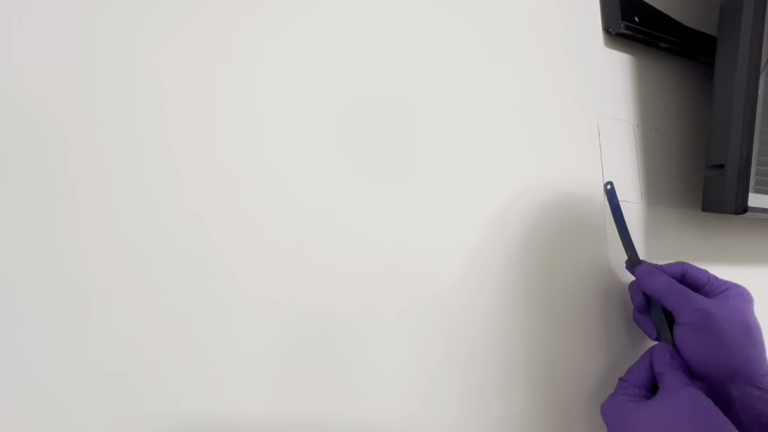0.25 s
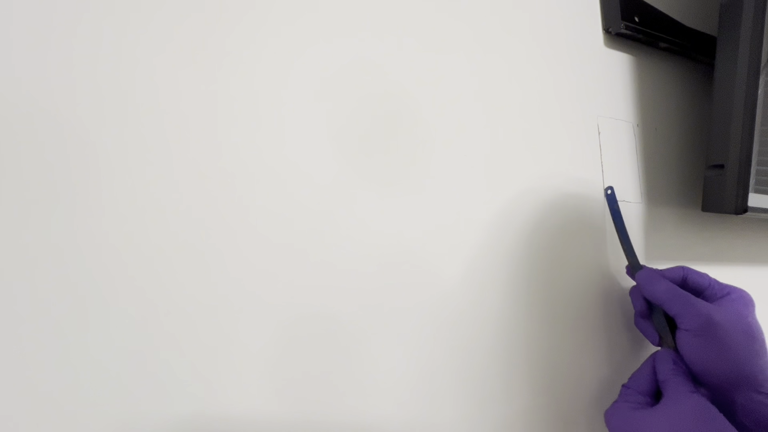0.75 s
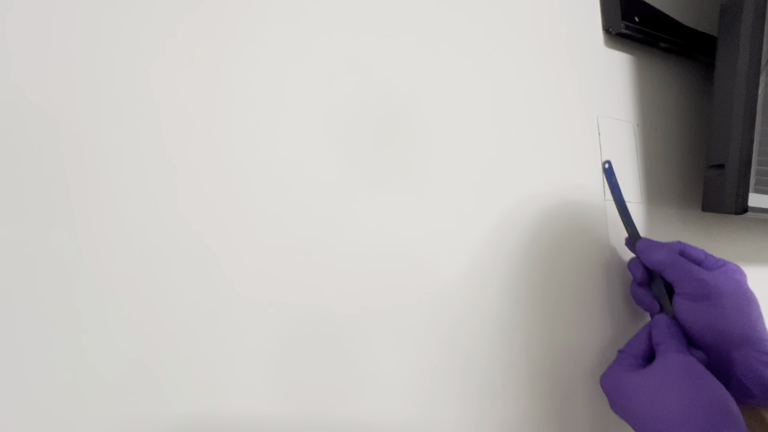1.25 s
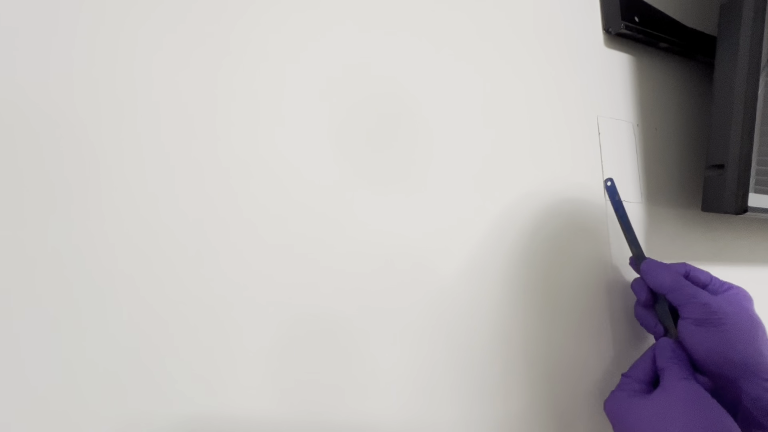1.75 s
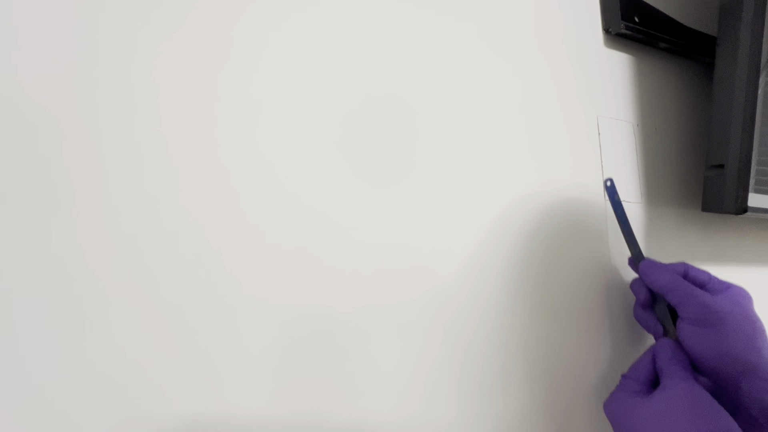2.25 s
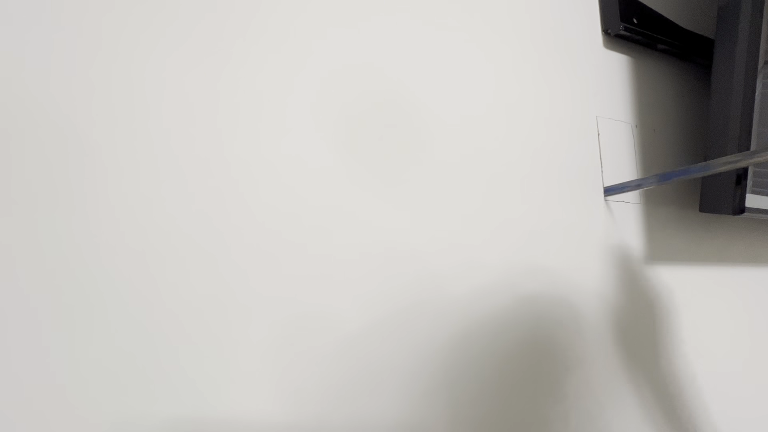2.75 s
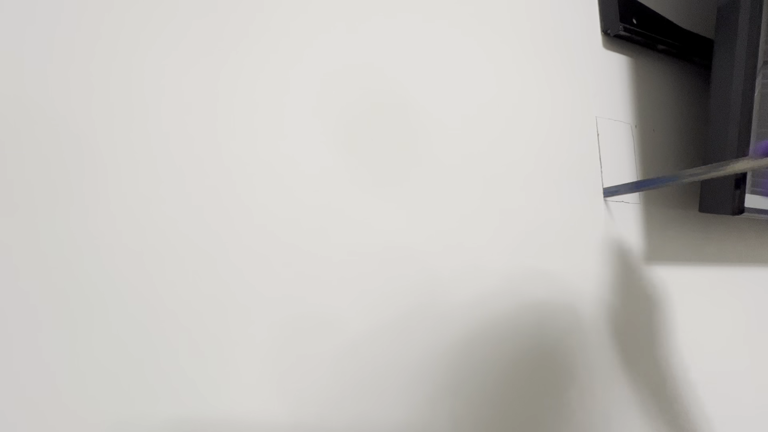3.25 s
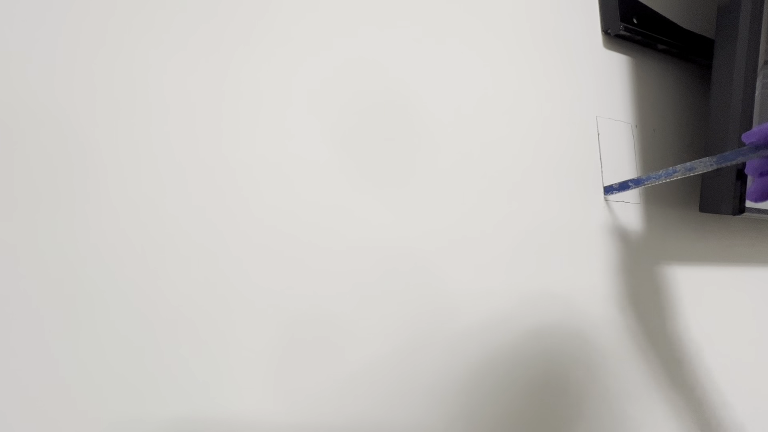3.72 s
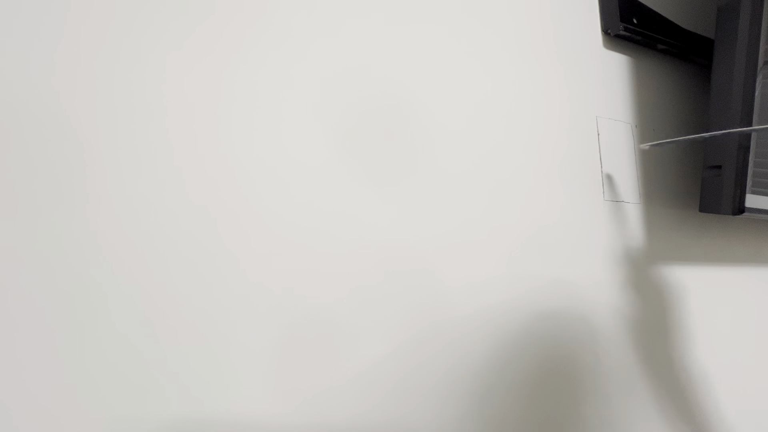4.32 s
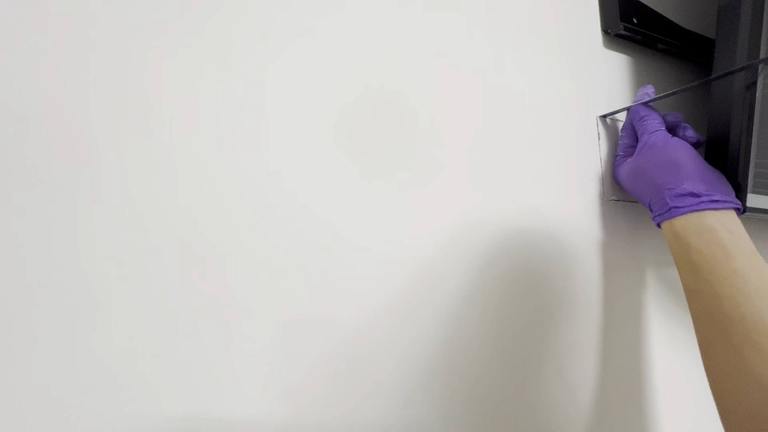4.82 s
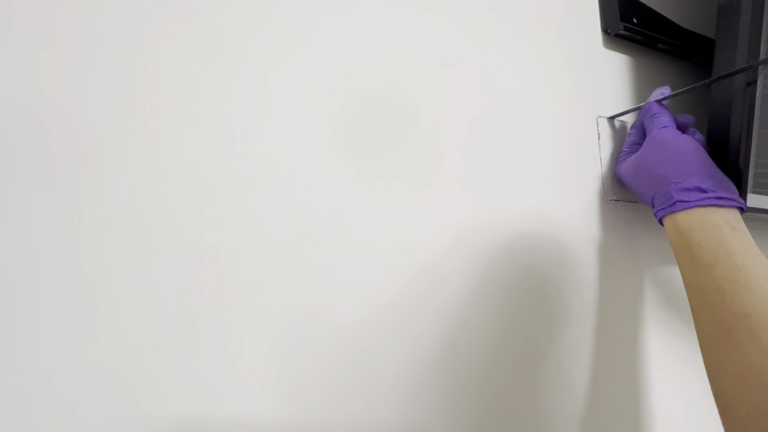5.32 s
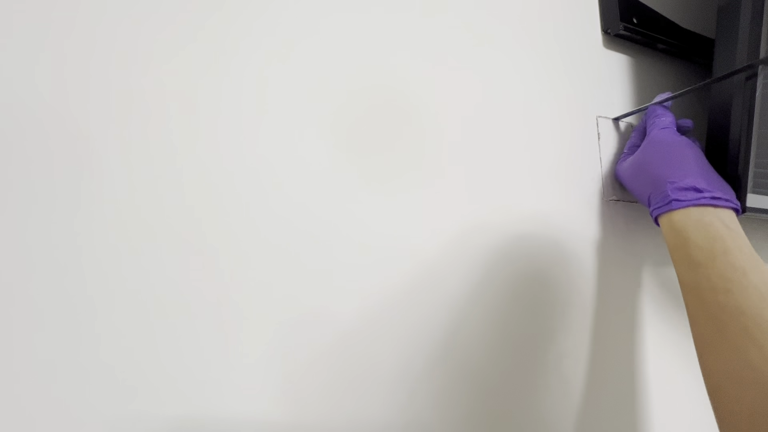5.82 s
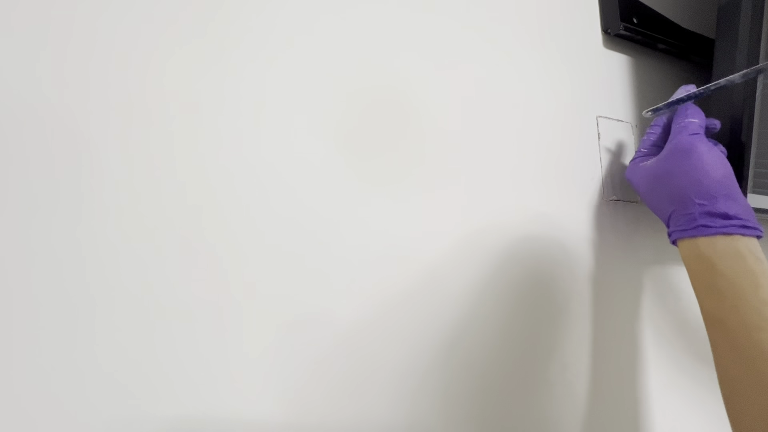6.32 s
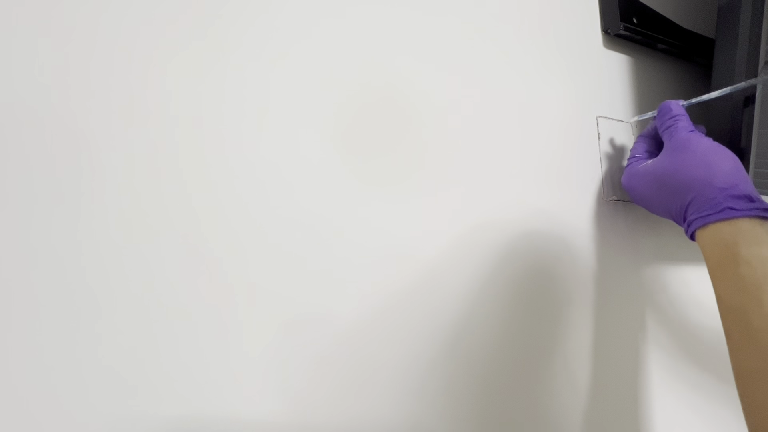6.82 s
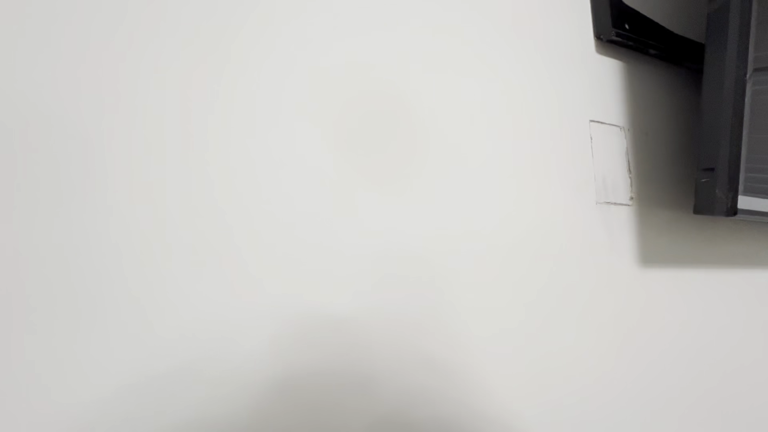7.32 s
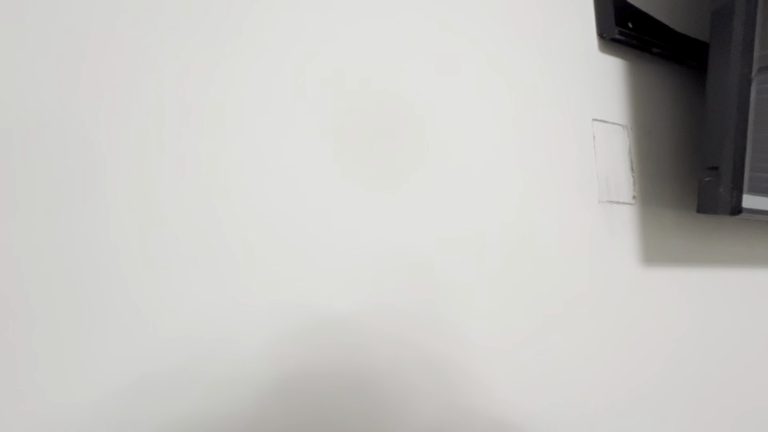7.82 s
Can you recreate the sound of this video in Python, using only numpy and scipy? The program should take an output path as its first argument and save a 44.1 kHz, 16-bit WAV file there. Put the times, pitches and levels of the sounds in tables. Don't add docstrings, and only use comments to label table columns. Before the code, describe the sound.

Close indoor drywall cutting: faint rhythmic scoring, a burst of rough hollow sawing, gentle scraping, near quiet, then one hard cracking blow and bumps.

```python
import sys
import numpy as np
from scipy import signal
from scipy.fft import rfft, irfft, next_fast_len
from scipy.io import wavfile
from scipy.ndimage import map_coordinates

SR = 44100
rng = np.random.default_rng(int(sys.argv[2]) if len(sys.argv) > 2 else 0)


def bounce(signal):
    frames = np.transpose(np.atleast_2d(signal))
    limited = np.clip(frames, -1, 1)
    pcm = np.round(limited * 32767).astype(np.int16)
    wavfile.write(sys.argv[1], SR, pcm)


def voltage_ratio(decibels):
    exponent = np.asarray(decibels, float) / 20
    return 10 ** exponent


N = 355887

# pitch in Hz, width in Hz, level in dB.
BOARD_MODES = [(349, 30, -2.5), (413, 21.3, 1), (458.4, 16, -0.5), (563.7, 11, 5), (625.4, 14, 4.5),
               (687, 11, 6), (756.8, 16, 2.5), (880, 10, 2.5), (905.4, 22, 0.5), (1092, 10, 7.5),
               (1169, 9.9, 0), (1445, 25, 4.5), (1484, 16, 2.5), (1752, 20, 11)]
SCENE_CHANGES = [2.452, 3.458, 4.46, 7.213]
DEEP_BITE = .52


def unit(x):
    return x / np.sqrt(np.mean(x ** 2) + 1e-20)


def along(points, hz):
    f, v = np.transpose(points)
    return np.interp(np.log(hz + 1), np.log(f + 1), v)


def filtered(x, response):
    m = next_fast_len(N + SR // 2)
    return irfft(rfft(x, m) * response(np.fft.rfftfreq(m, 1 / SR)), m)[..., :N]


def modes(table, f):
    total = 0
    for k, (centre, width, db) in enumerate(table):
        ring = 1j * f * width / (centre * centre - f * f + 1j * f * width)
        total = total + (-1) ** k * voltage_ratio(db) * ring
    return total


def wobble(rate):
    knots = rng.standard_normal(int(N * rate / SR) + 4)
    return map_coordinates(knots, [np.arange(N) * rate / SR])


def curves(table):
    s, *cols = np.transpose(table)
    return [np.interp(np.arange(N) / SR, s, c) for c in cols]


def crumbs(spiky_db, rate):
    return unit(rng.standard_normal(N) * voltage_ratio(spiky_db * wobble(rate)))


def ports(near, far, side, alike):
    # pitch in Hz, further lag of the left port in radians.
    twist = [(60, -0.094), (330, -0.71), (480, 1), (680, 1), (950, 0.28), (2000, -0.27), (2800, -1.44),
             (4000, 0.39), (6000, 0.47), (8700, -2)]
    lag_s = 12 / SR
    turn = lambda hz: np.arccos(np.clip(along(alike, hz), -1, 1)) / 2
    mid, rest = filtered(np.array([near, far]), lambda hz: np.array([np.cos(turn(hz)), np.sin(turn(hz))]))
    half = np.array([[.5], [-.5]])

    def response(hz):
        delay = np.exp(-2j * np.pi * hz * lag_s * (half + .5) - 1j * half * along(twist, hz))
        return voltage_ratio(half * along(side, hz)) * delay

    return filtered(np.array([mid + rest, mid - rest]), response)


def layer(source, response, level_db):
    # pitch in Hz, left minus right in dB.
    side = [(60, 4.5), (150, 5.5), (380, 0), (800, 2.5), (2000, 4), (3000, 0.5), (4500, -4.5), (6400, 2.5),
            (7500, -1), (8700, -8.5), (12000, 0.5)]
    # pitch in Hz, likeness of the two ports from 0 to 1.
    alike = [(60, 0.78), (130, 0.7), (300, 0.44), (480, 0.27), (700, 0.65), (1500, 0.56), (3000, 0.12),
             (8000, 0.37)]
    near, far = (unit(filtered(x, response)) for x in source)
    return voltage_ratio(level_db) * ports(near, far, side, alike)


def place_index():
    starts = [0, 2.452, 3.458, 3.97, 4.46, 7.213, 7.425]
    return np.searchsorted(starts, np.arange(N) / SR, "right") - 1


def weight():
    # time in seconds, level in dB.
    resting = [(0, -54.5), (2.44, -58.5), (2.46, -46.5), (3.45, -43), (3.465, -63), (4.44, -62.5),
               (4.47, -50.5), (5.2, -57.5), (5.98, -42), (6.2, -57.5), (6.5, -67.5), (6.83, -67),
               (7.2, -83), (7.24, -38.5), (7.65, -49), (8.07, -68.5)]
    return curves(resting)[0]


def swells(rows, rest_db, sharp):
    rise_full, fall_full = 1.31, 0.95
    sharpness = np.array([[1], [sharp]])
    t, power = np.arange(N) / SR, voltage_ratio(2 * np.array(rest_db))
    for s, first_db, second_db, rise, fall in rows:
        near = slice(max(int((s - rise) * SR), 0), int((s + fall) * SR))
        u = t[near] - s
        rising = 1 - np.abs(u / rise) ** rise_full
        falling = 1 - np.abs(u / fall) ** fall_full
        same_scene = np.searchsorted(SCENE_CHANGES, t[near]) == np.searchsorted(SCENE_CHANGES, s)
        root = np.clip(np.where(u < 0, rising, falling), 0, 1) * same_scene
        power[:, near] += voltage_ratio(2 * np.array([[first_db], [second_db]])) * root ** (4 * sharpness)
    return 10 * np.log10(power)


def strokes():
    # fastest moment in seconds, teeth in dB, grit in dB, rise and fall in seconds.
    light = [(.034, -51.5, -57.5, 0.063, 0.11), (.176, -49, -61, 0.12, 0.14), (.296, -53.5, -60, 0.1, 0.15),
             (.418, -48, -59.5, 0.047, .11), (.55, -54.5, -61.5, 0.093, 0.12),
             (.695, -52, -63, 0.082, 0.12), (.829, -60.5, -73, .07, 0.16), (.957, -47.5, -60, 0.05, 0.17),
             (1.097, -54.5, -63, 0.091, 0.16), (1.24, -47, -53, 0.066, 0.15),
             (1.449, -56, -58.5, 0.15, 0.1), (1.557, -46.5, -52, 0.072, 0.14),
             (1.727, -51.5, -57, 0.17, 0.11), (1.837, -45, -51.5, 0.093, 0.18),
             (1.947, -51.5, -54.5, 0.049, 0.24), (2.117, -44, -53, 0.068, 0.13),
             (2.281, -52, -57.5, 0.17, 0.1), (2.375, -44, -54.5, 0.064, 0.34)]
    deep = [(2.455, -31, -56, 0.0096, 0.063), (2.51, -40, -55, 0.079, 0.11),
            (2.531, -31, -51.5, 0.0053, 0.049), (2.558, -21, -38.5, 0.022, 0.14),
            (2.701, -32.5, -44, 0.052, 0.21), (2.758, -29.5, -52, 0.16, 0.11),
            (2.881, -22, -43, 0.018, 0.055), (2.904, -20, -32.5, 0.028, 0.057),
            (2.922, -21.5, -38.5, 0.018, 0.11), (3.048, -24.5, -41, 0.08, 0.16),
            (3.09, -25.5, -61, 0.071, 0.039), (3.208, -28.5, -48.5, 0.038, .04),
            (3.219, -20.5, -38.5, 0.021, 0.088), (3.247, -19.5, -37, 0.085, 0.079),
            (3.35, -29.5, -45.5, 0.016, 0.2), (3.404, -29, -46, 0.25, 0.073),
            (3.592, -36, -46.5, 0.021, 0.083), (3.62, -41, -54.5, 0.065, 0.13),
            (3.72, -57.5, -73, 0.07, 0.14), (3.796, -37, -49, 0.027, 0.068), (3.845, -52, -65, .04, 0.18),
            (4.137, -74, -64, .05, .1), (4.315, -70.5, -68.5, 0.06, 0.14)]
    scrapes = [(4.464, -49, -61, 0.0072, .06), (4.516, -35, -52, 0.074, 0.17),
               (4.652, -42.5, -54.5, 0.09, 0.14), (4.779, -36.5, -51, 0.086, 0.27),
               (4.9, -47.5, -61, 0.1, 0.12), (5.12, -53.5, -55, 0.05, .1),
               (5.183, -41.5, -51.5, 0.14, 0.11), (5.307, -35.5, -51, 0.11, 0.17),
               (5.45, -46, -60, 0.083, 0.17), (5.57, -38, -54.5, 0.072, 0.11),
               (5.719, -49.5, -55, 0.0077, 0.071), (5.818, -48.5, -51, .008, 0.045),
               (5.86, -37, -56, 0.0044, 0.016), (5.759, -39, -51.5, 0.039, 0.077),
               (5.846, -41.5, -51.5, 0.077, .06), (5.881, -36, -46.5, 0.044, 0.18),
               (5.885, -30, -41, 0.035, 0.044), (6.15, -84, -71, .06, 0.35), (6.5, -84.5, -66.5, .07, 0.17),
               (6.6, -77, -72, .04, 0.11), (6.7, -64.5, -76, 0.037, 0.035),
               (7.34, -45.5, -72.5, .03, 0.069), (7.377, -49, -61, .006, 0.036),
               (7.39, -35.5, -60.5, 0.052, 0.07), (7.45, -41, -55, 0.09, 0.27),
               (7.524, -42.5, -52, 0.14, 0.089), (7.566, -57, -52.5, 0.1, 0.049),
               (7.95, -70, -75.5, 0.26, 0.33), (7.97, -71, -66, .03, .04), (8.06, -61, -68, .12, .1)]
    rest_teeth_db, rest_grit_db = -18, -28.5
    weight_db = weight()
    return swells(light + deep + scrapes, [weight_db + rest_teeth_db, weight_db + rest_grit_db], sharp=0.99)


def fan():
    # pitch in Hz, level in dB per Hz.
    fan_colour = [(20, -33.5), (45, -1), (140, 0), (200, -16), (500, -7.5), (670, -17.5), (1050, -23),
                  (1400, -9), (2000, -6), (2600, -8), (3700, -21.5), (6700, -11), (9500, -32.5),
                  (15000, -46)]
    # pitch in Hz, left minus right in dB.
    fan_side = [(60, 14.5), (200, 33.5), (700, 12.5), (2000, 28), (4000, 10), (6700, 15.5), (10000, 18)]
    # time in seconds, hum in dB, hiss in dB.
    drift = [(0, -1, 0), (2.4, -1, -0.5), (4, 0, -0.5), (4.4, 0.5, 0), (6.2, -1, 0), (6.6, -2, -0.5),
             (7.2, -3, -1.5), (7.6, 4, -0.5), (8.07, 0, 1.5)]
    # pitch in Hz, level in dB per Hz.
    port_noise = [(100, -16), (1000, 9), (2500, -8), (9000, -7.5), (10300, -22), (12900, -18),
                  (13600, -44.5)]
    hum_top_hz, fan_db, port_db = 300, -59 - 6.0, -71.5
    air = [unit(filtered(rng.standard_normal(N), lambda f: voltage_ratio(along(fan_colour, f)))) for _ in "ab"]
    hum_db, hiss_db = curves(drift)
    low = filtered(np.array(air), lambda f: 1 / (1 + (f / hum_top_hz) ** 4))
    air = voltage_ratio(hum_db) * low + voltage_ratio(hiss_db) * (air - low)
    hiss = unit(filtered(rng.standard_normal((2, N)), lambda f: voltage_ratio(along(port_noise, f))))
    gusts = voltage_ratio(fan_db + 1.2 * wobble(2.176))
    return gusts * ports(*air, fan_side, [(60, 0.6), (1000, 0.62)]) + voltage_ratio(port_db) * hiss


def whine():
    hz, rms_db = 10314, -107.5
    return np.sqrt(2) * voltage_ratio(rms_db) * np.sin(2 * np.pi * hz * np.arange(N) / SR)


def steps():
    # time in seconds, left jump, right jump, fade in seconds.
    jumps = [(7.2129, .13, .02, .004), (7.2332, -.07, -.02, .003), (3.4575, .008, .005, .002),
             (4.1272, .003, .011, .0001)]
    out, t = np.zeros((2, N)), np.arange(SR // 30) / SR
    for s, left, right, fade in jumps:
        out[:, round(s * SR):][:, :len(t)] += np.outer([left, right], np.exp(-t / fade))
    return out


def heave():
    # pitch in Hz, width in Hz, level in dB.
    sway_modes = [(45.4, 15.6, -5), (68.1, 15.7, 1), (82.1, 9.7, 2.5)]
    boom_modes = [(136, 20, 2), (183.8, 13, 0), (226, 13, -3), (270, 24, -6.5)]
    # time in seconds, sway in dB, boom in dB, rise and fall
    # in seconds.
    shoves = [(.2, -47, -50, 0.15, 0.042), (.47, -43, -44.5, 0.13, 0.14), (.85, -57, -59, 0.28, .08),
              (1.01, -49, -52, 0.1, 0.17), (1.15, -43, -53, 0.056, 0.077), (1.33, -46, -53.5, 0.34, 0.27),
              (1.62, -50, -66, 0.15, 0.27), (1.95, -49, -53, 0.19, 0.13), (2.1, -54, -44, 0.059, 0.14),
              (2.43, -53, -48.5, .2, 0.082), (2.576, -31.5, -23, 0.13, 0.18),
              (2.752, -40.5, -33.5, 0.21, 0.08), (2.926, -46.5, -28, 0.093, 0.18),
              (3.12, -42.5, -54, .07, .09), (3.372, -44, -28.5, 0.095, 0.32),
              (3.636, -35, -35.5, 0.082, 0.15), (3.83, -43.5, -39, 0.15, 0.24),
              (4.469, -56, -38, 0.018, 0.31), (4.88, -36.5, -46, 0.17, 0.25), (5.3, -36.5, -43, 0.075, 0.18),
             (5.6, -41.5, -39.5, 0.075, 0.15), (5.83, -40, -52, 0.11, 0.06), (5.89, -36, -32, 0.05, 0.1),
             (6.62, -56, -80, 0.051, 0.172), (7.25, -48, -29.5, 0.051, 0.1),
             (7.39, -20.5, -22, 0.035, 0.079), (7.474, -33.5, -51, 0.076, 0.035),
             (7.728, -43, -46.5, 0.072, 0.25), (7.88, -50, -57, .1, .12), (8.024, -45.5, -57, 0.21, 0.16)]
    rest_boom_db, lag_s = -8, 0.022
    trail_db = np.array([0, -9.5, -1.5, -5.5, -4, 1, -8])
    weight_db = weight()
    sway_db, push_db = swells(shoves, [weight_db, weight_db + rest_boom_db], sharp=0.92)

    keep = np.exp(-1 / (lag_s * SR))
    parts = np.split(voltage_ratio(2 * strokes()[0]), (np.array(SCENE_CHANGES) * SR).astype(int))
    late = [signal.lfilter([(1 - keep) ** 2], [1, -2 * keep, keep ** 2], part) for part in parts]
    trail = np.abs(np.concatenate(late)) * voltage_ratio(2 * trail_db)[place_index()]
    boom_db = 10 * np.log10(voltage_ratio(2 * push_db) + trail)

    sway_push = [crumbs(spiky_db=2.0, rate=11) for _ in "ab"]
    boom_push = [crumbs(spiky_db=3.5, rate=26) for _ in "ab"]
    steep = lambda f: modes(boom_modes, f) / (1 + 1j * (f / 330) ** 3)
    sway = layer(sway_push, lambda f: modes(sway_modes, f), sway_db + 0.5)
    return sway + layer(boom_push, steep, boom_db - 0.5)


def knock():
    # time in seconds, level in dB, pitch in Hz, seconds to fade by 60 dB.
    bumps = [(5.756, -27.5, 330, 0.1), (5.875, -27, 330, 0.095), (7.2336, -12, 300, 0.066),
             (7.329, -20, 127, 0.11), (7.376, -8.5, 207, 0.038), (7.383, -11.5, 270, 0.11),
             (7.384, -21, 420, 0.06), (5.881, -16, 130, 0.019), (3.586, -40, 520, 0.11),
             (3.588, -31, 200, 0.19), (3.788, -32, 350, 0.19), (3.79, -30.5, 617, 0.2),
             (4.5, -38.5, 220, 0.35), (4.55, -30.5, 250, 0.31), (4.8, -39, 536, 0.14),
             (4.85, -32, 130, 0.33), (5.3, -33, 230, .25), (2.55, -25, 465, 0.12), (7.93, -42.5, 130, 1),
             (7.67, -54, 394, 0.84)]
    turned_s = 7.3
    out, t = np.zeros((2, N + SR)), np.arange(SR // 3) / SR
    for s, db, hz, t60 in bumps:
        sides = voltage_ratio([[4], [-1.5]]) if s < turned_s else np.array([[2.2], [-0.34]])
        note = voltage_ratio(db - 60 * t / t60) * np.sin(2 * np.pi * hz * t) * (1 - np.exp(-t / 0.009))
        out[:, round(s * SR):][:, :len(t)] += sides * note
    return out[:, :N]


def ticks():
    # time in seconds, peak in dB, tap on the board in dB, left minus right in dB.
    contacts = [(2.45, -42, 1, 3.5), (2.555, -43, 21, -3), (2.8761, -39.5, 16.5, 9.5), (3.202, -37, 17, -3),
                (3.2156, -40, 24, -2.5), (3.592, -42, 15.5, -7), (3.7902, -41.5, 10, -2),
                (4.127, -41.5, -20.5, -10), (4.461, -51, 26, -2), (5.7553, -55, 12, 5),
                (5.8786, -39.5, 12, -1), (7.373, -44, 3, 8), (7.7899, -63, -5.5, 20),
                (7.8906, -48, -20, -4), (5.858, -45, 7, 0), (2.5641, -39, 12, 0), (2.6887, -46, 9, -1),
                (2.8879, -39.5, 4, 2), (2.9, -39, 9.5, -4), (2.91, -39.5, 13, 3), (3.047, -41, 5.5, 2),
                (3.3373, -44, 4, 0)]
    crack, tap, t = np.zeros((2, N + SR)), np.zeros((2, N)), np.arange(SR // 50) / SR
    for s, db, body_db, pan_db in contacts:
        sides = voltage_ratio(db + np.array([.5, -.5]) * pan_db)
        burst = voltage_ratio(-60 * t / 0.012) * rng.standard_normal(len(t))
        crack[:, round(s * SR):][:, :len(t)] += sides[:, None] * burst
        tap[:, round(s * SR)] = sides * voltage_ratio(body_db + 6.0)
    bright = lambda f: f / (f - 1800j) / (1 + (f / 8500) ** 6)
    return filtered(crack[:, :N], bright) + filtered(tap, lambda f: modes(BOARD_MODES, f))


def bending(f, bend):
    return np.exp(-4j * np.pi * bend * np.sqrt(f))


def blow():
    # pitch in Hz, level in dB per Hz.
    wave_left = [(20, -13), (45, 5), (100, 1), (250, 5), (450, -6.5), (700, -15.5), (1000, -41),
                 (1400, -120)]
    wave_right = [(20, -21.5), (45, 0), (100, 1.5), (250, 1), (450, -5.5), (700, -24), (1000, -44),
                  (1400, -120)]
    # pitch in Hz, width in Hz, level in dB.
    crack_left = [(2950, 1300, -1), (5100, 1250, 3.5), (6900, 600, 0), (8400, 2800, -3), (14000, 900, -31)]
    crack_right = [(3000, 1903, -37), (7300, 1800, -9.5), (9700, 3300, -15), (13950, 2400, -23.5)]
    blow_s, slap_s = np.array([[7.2131], [7.2123]]), np.array([[7.21895], [7.21745]])
    crack_start = round(7.2171 * SR)
    hit = np.zeros(N)
    hit[0] = 1

    def board_response(f):
        colour = voltage_ratio(32.0 + np.array([along(wave_left, f), along(wave_right, f)]))
        arrival = np.exp(2j * np.pi * (.145 - f * blow_s))
        back = 0.084 * bending(f, 0.056) / (1 + (f / 200) ** 4)
        slap = voltage_ratio(28.5) * modes([(1100, 400, 0)], f) / (1 + 1j * f / 2000) ** 2
        slap = slap * np.exp(-2j * np.pi * f * slap_s) * [[1], [-1]]
        return colour * arrival * (bending(f, .163) + back) + slap

    snap, t = np.zeros(N), np.arange(SR // 100) / SR
    burst = voltage_ratio(4 - 60 * t / .007) * (1 - np.exp(-t / 0.0002))
    snap[crack_start:][:len(t)] = burst * rng.standard_normal(len(t))
    snap[crack_start + np.array([12, 29, 38])] += voltage_ratio([12, 14.5, 12])

    def crack_response(f):
        dull = 1.1 / (1 + 1j * f / 10000) ** 8
        spread = bending(f, .08) * np.exp(2j * np.pi * f * .0011)
        return np.array([spread * dull * modes(crack_left, f), np.sqrt(dull) * modes(crack_right, f)])

    return filtered(hit, board_response) + filtered(snap, crack_response)


def tooth_rate():
    # fastest moment in seconds, teeth per second.
    speed = [(2.57, 490), (2.74, 442), (2.925, 750), (3.055, 580), (3.24, 740), (3.39, 475)]
    slowing, swing_s = .25, 0.083
    s, top_hz = np.transpose(speed)
    t = np.arange(N) / SR
    nearest = np.searchsorted((s[1:] + s[:-1]) / 2, t)
    return top_hz[nearest] * (1 - slowing * np.minimum(np.abs(t - s[nearest]) / swing_s, 1) ** 2)


def colour_by_place(board, place):
    # pitch in Hz, level in dB.
    places = [
        [(400, 0.5), (600, 0.5), (1000, -1), (1600, -5.5), (3000, 0.5), (5000, -1.5), (11000, -4.5)],
        [(330, 1), (580, 4.5), (750, 3), (1050, 4), (1700, -2.5), (2700, 0.5), (5000, -2), (12000, -3)],
        [(330, 3.5), (600, 1.5), (850, 5), (1100, -2), (1600, -1.5), (3000, -0.5), (11000, 1.5)],
        [(350, -4.5), (650, -17), (1000, -15), (1600, -6), (3000, -1), (5000, 0), (11000, 11)],
        [(300, 0.5), (600, -6.5), (1000, -5), (1330, 0.5), (1800, -3.5), (3500, -0.5), (9500, 1), (12500, 0)],
        [(350, 1), (650, -10), (1000, -2.5), (1400, -1.5), (3000, -12), (5000, 2), (11000, -23)],
        [(350, -1.5), (650, -12), (1000, -1.5), (1600, -4), (3000, -9.5), (5000, -4.5), (11000, -0.5)],
    ]
    # pitch in Hz, width in Hz, level in dB.
    upper = [(1417, 22, -3.5), (2540, 180, -6.5), (2957, 23, -13), (3856, 25, 5.5), (4162, 47, 2.5),
             (4906, 50, -14.5), (5280, 13, -4)]
    upper_share = [0.59, 1.27, 0.72, .3, 0.37, .2, .2]
    dense = rng.standard_normal((len(places), 600))
    out = np.zeros((2, N))
    for k, points in enumerate(places):
        def response(f):
            ripple = 2.5 * np.interp(f / 38, np.arange(600), dense[k]) * (f > 1200)
            return voltage_ratio(along(points, f) + ripple) * (1 + upper_share[k] * np.abs(modes(upper, f)))

        out += (place == k) * filtered(board, response)
    return out


def saw():
    # share of regular tooth pulses from 0 to 1, blade ring in dB, left minus right in dB.
    takes = [(0.061, -9, 0), (DEEP_BITE, -22, 0), (0.011, -7.5, -0.57), (.01, -15, 0),
             (0.011, -36.5, -0.87), (0.023, -27, 3.1), (0.025, -34, 9.2)]
    # pitch in Hz, level in dB per Hz.
    tooth = [(200, -26), (420, 1), (580, 0), (750, 5.5), (950, -4), (1500, -3.5), (2000, -17), (5000, -50)]
    teeth = [(150, -22.5), (300, 0), (500, 1.5), (760, -6), (1500, -13.5), (2200, -24.5), (3600, -52.5)]
    grit_colour = [(700, -1.5), (1500, 7.5), (3000, 0.5), (3600, -4.5), (4200, -8), (6200, -4),
                   (7400, -8.5), (8800, -13.5), (10000, -17.5), (12000, -39), (13800, -69.5), (15300, -44),
                   (16000, -84)]
    # pitch in Hz, width in Hz, level in dB.
    blade_modes = [(8640, 890, 0)]
    teeth_db, grit_db = strokes()
    place = place_index()
    bite, ring_db, pan_db = np.transpose(takes)[:, place]
    bite = np.clip(bite, .01, .99)

    turns = np.cumsum(tooth_rate() * (1 + .03 * wobble(150))) / SR
    catches = unit(np.diff(np.floor(turns), prepend=0) * voltage_ratio(4 * wobble(120)))
    catch_response = lambda f: voltage_ratio(along(tooth, f)) * (0.92 + modes(BOARD_MODES, f))
    tone = layer((catches, np.roll(catches, 130)), catch_response, teeth_db - 1.0)

    scratches = [crumbs(spiky_db=2.5, rate=300) for _ in "ab"]
    rasp_response = lambda f: voltage_ratio(along(teeth, f)) * (0.72 + modes(BOARD_MODES, f))
    rasp = layer(scratches, rasp_response, teeth_db + 2.5)

    gate = 1 + 0.17 * np.cos(2 * np.pi * turns)
    grains = [gate * crumbs(spiky_db=2.5, rate=170) for _ in "ab"]
    grit = layer(grains, lambda f: voltage_ratio(along(grit_colour, f)), grit_db + 7.0)

    board = colour_by_place(np.sqrt(bite) * tone + np.sqrt(1 - bite) * rasp + grit, place)
    blade_db = grit_db + ring_db + 0.324 * np.minimum(grit_db + 46.5, 0)
    blade = layer(grains, lambda f: modes(blade_modes, f) ** 2, blade_db)
    return (board + blade) * voltage_ratio(np.outer([.5, -.5], pan_db))


def scene():
    return fan() + whine() + steps() + heave() + knock() + ticks() + blow() + saw()


def low_pass(x):
    return signal.sosfilt(signal.butter(12, 15800, fs=SR, output="sos"), x)


def record(dry):
    ceiling = 1.2
    mix = dry / (1 + np.abs(dry / ceiling) ** 6) ** (1 / 6)
    return low_pass(mix)


dry = scene()
out = record(dry)
bounce(out)
```